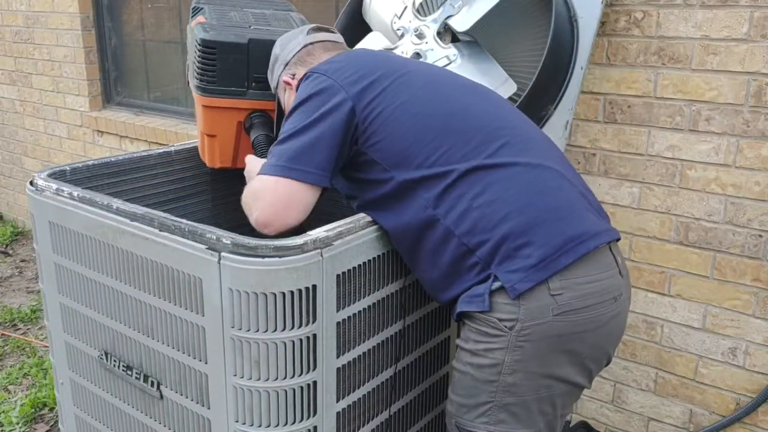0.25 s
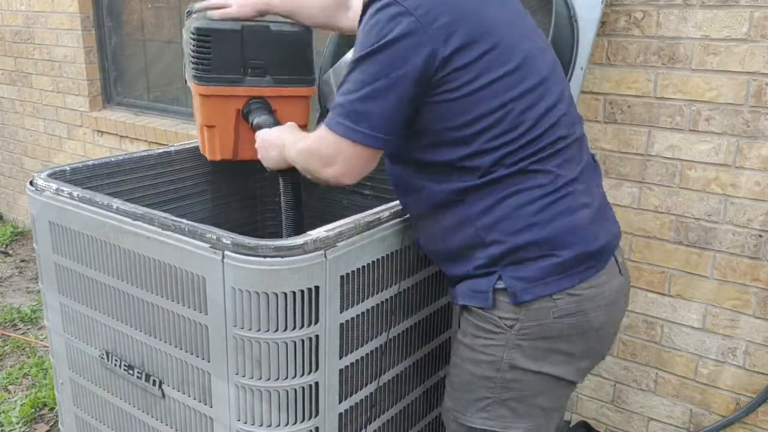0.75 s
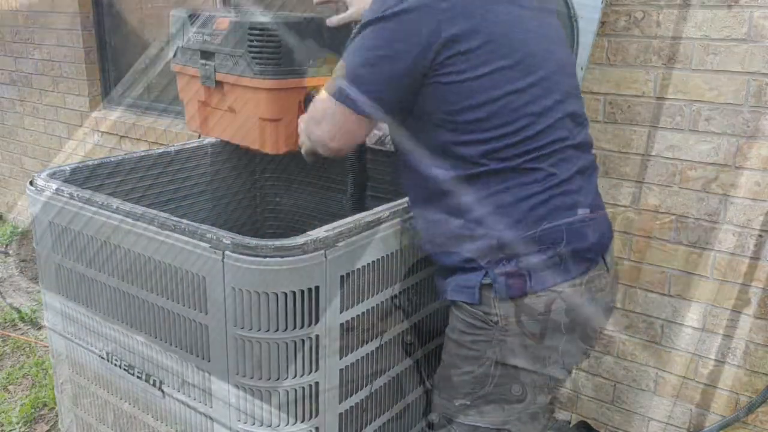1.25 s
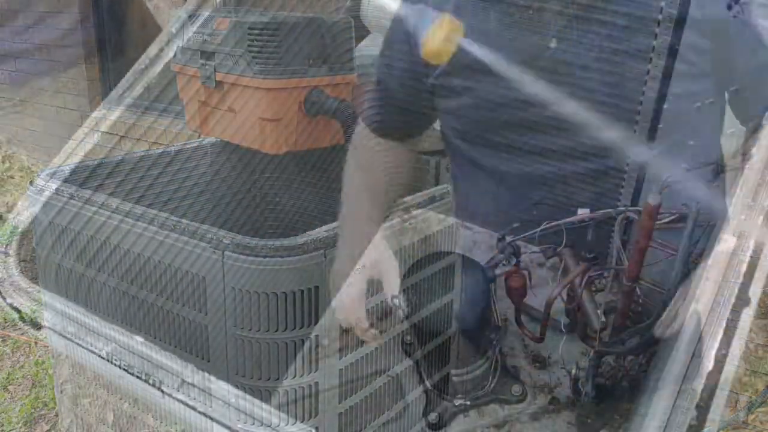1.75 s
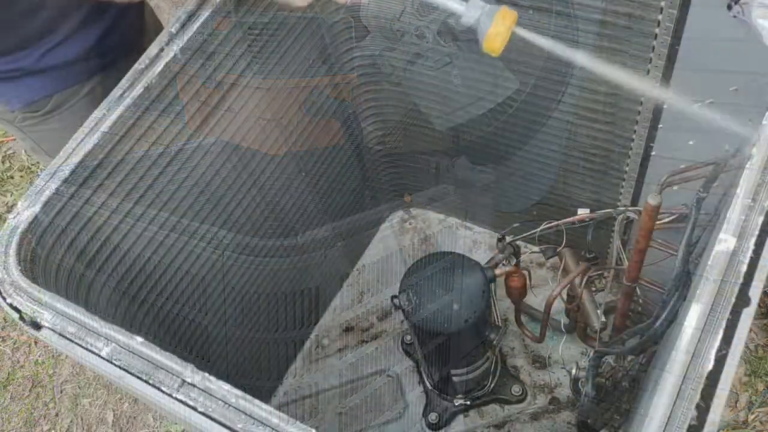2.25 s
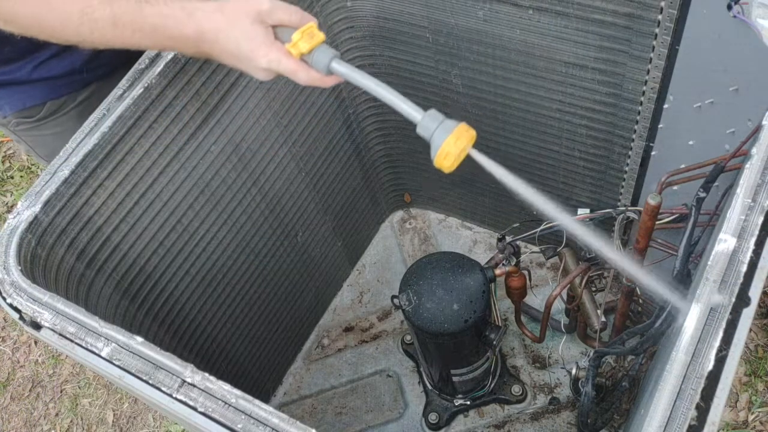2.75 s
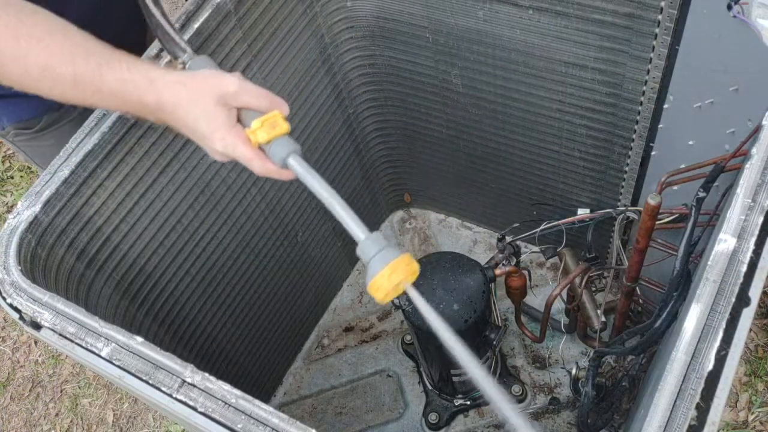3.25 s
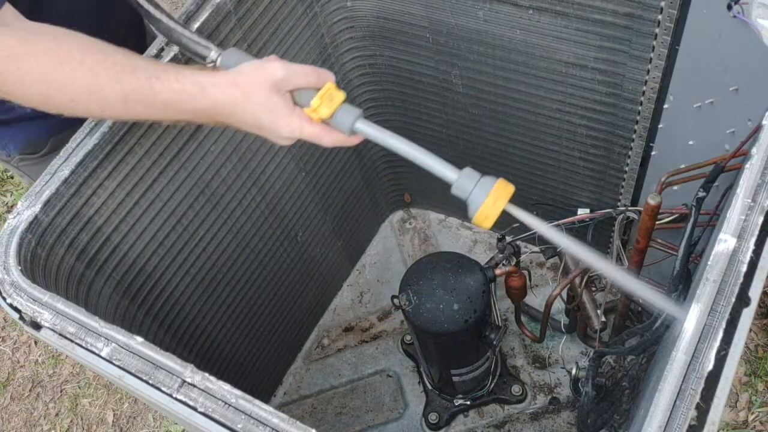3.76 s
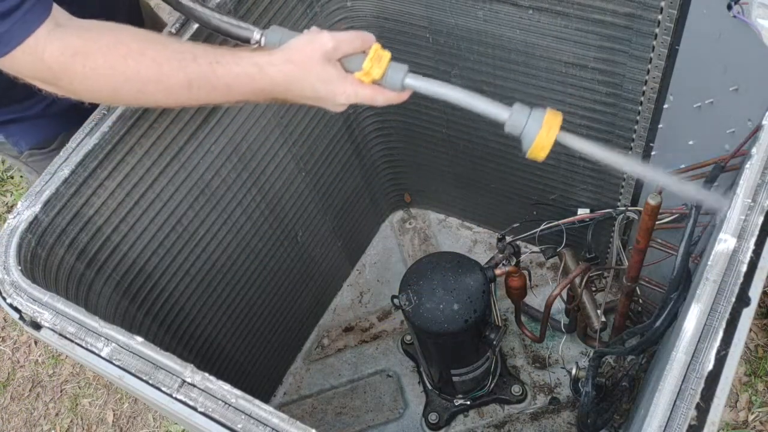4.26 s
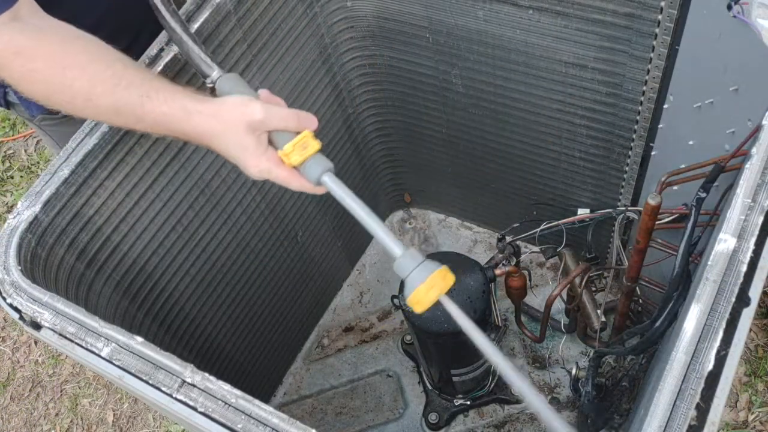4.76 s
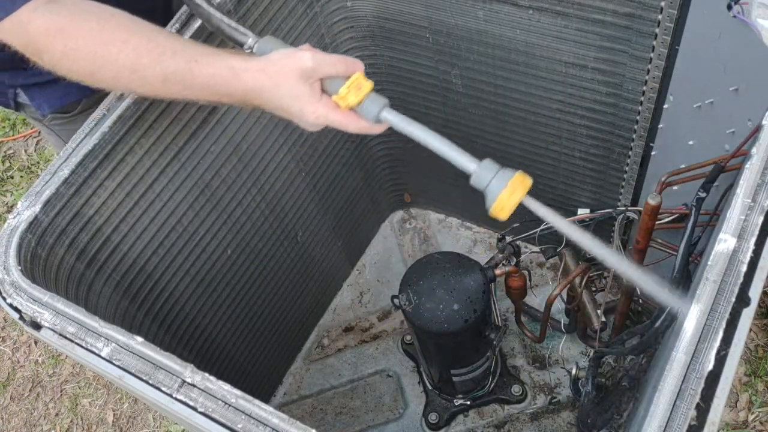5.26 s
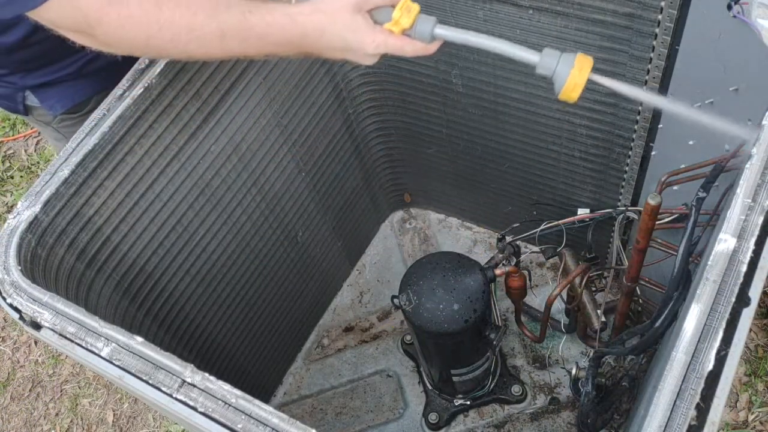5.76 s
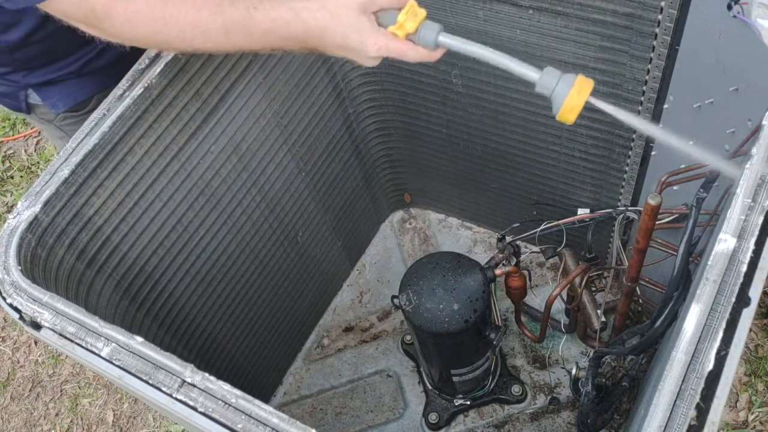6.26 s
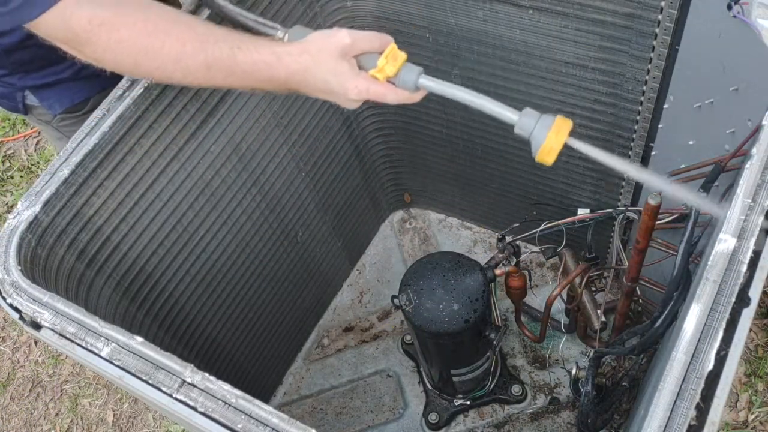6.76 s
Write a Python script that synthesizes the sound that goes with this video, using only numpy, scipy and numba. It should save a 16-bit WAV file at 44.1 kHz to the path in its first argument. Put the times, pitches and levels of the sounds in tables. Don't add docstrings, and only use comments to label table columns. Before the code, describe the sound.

A garden hose jet plays over metal coil fins outdoors, heard close in mono. Silence comes first, then abrupt dense hissing with a ringing edge around the fins. The jet slips off for a moment near one second, returns, swells around two and a half, and settles to a quieter, uneven sweep with late surges. Splashing tubes, short cabinet reflections, faint panel drumming and low yard hum surround it.

```python
import sys
import numpy as np
from scipy import signal
from scipy.fft import rfft, irfft
from scipy.io import wavfile
from scipy.ndimage import uniform_filter1d
from numba import njit

SR = 44100
rng = np.random.default_rng(int(sys.argv[2]) if len(sys.argv) > 2 else 0)


def wrap_up_sound(samples):
    columns = np.atleast_2d(samples).T
    tamed = np.clip(columns, -1, 1)
    steps = np.round(tamed * 32767).astype(np.int16)
    wavfile.write(sys.argv[1], SR, steps)


def rack_gain(trim_db):
    fader = np.asarray(trim_db, float)
    return 10 ** (fader / 20)


N = 308700

# (time [s], jet force [dB], fin ring against force [dB], fin ring pitch [Hz])
JET_AIM = [(0.58, -27, 0, 2170), (0.8, -23.5, -1, 2135), (1.12, -28, -4, 2210), (1.3, -27.5, -5.5, 2050),
           (1.79, -31.5, -4, 2014), (1.97, -28.5, -4.5, 2080), (2.3, -25, -8.5, 1970),
           (2.63, -24, -3, 2036), (2.76, -26.5, -5.5, 2050), (3.1, -31, -3, 1965), (3.5, -33.5, -4.5, 2055),
           (3.9, -29.5, -2.5, 1977), (4.1, -26, -5.5, 1995), (4.55, -31, -3.5, 1910),
           (5.0, -31.5, -5, 2020), (5.15, -33.5, -6.5, 1880), (5.8, -32.5, -5.5, 1994),
           (7.0, -30, -5.5, 1950)]
# (time [s], centre [Hz], sharp core against wide skirt [dB])
HISS_COLOUR = [(0.57, 7830, 24), (1.16, 7920, -4), (1.54, 7600, -4), (2.72, 7850, 12), (3.1, 7520, -4),
               (3.94, 7760, 18), (4.98, 7550, -8), (6.18, 7730, 7), (7.0, 7770, 13)]
# (pitch [Hz], width [Hz], level [dB])
FIN_MODES = [(1879, 26, 5.5), (1950, 33, 0), (2080, 120, -9.5), (2164, 115, 9.5), (2110, 330, -4)]
# (frequency [Hz], level [dB per Hz])
SPLASH_COLOUR = [(1200, -29), (2300, 7), (3200, 5), (4300, 5), (5300, 4.5), (6500, 2.5), (9000, -34)]
# (frequency [Hz], level [dB per Hz])
MIST_COLOUR = [(6500, -14), (9000, -1.5), (10000, 0), (11000, -3), (12500, -10.5), (14000, -13.5),
               (15800, -22)]
# (leaves [s], returns [s], loss [dB])
MISSES = [
    (0.851, 1.031, 23.5),
    (1.163, 1.258, 11.5),
]
# (time [s], half length [s], gain [dB],
# extra mist [dB])
SURGES = [(1.31, 0.016, 2, -3), (1.37, 0.036, -4.5, 6), (1.42, .02, 2.5, -2), (1.55, 0.1, -1.5, 4),
          (1.66, 0.026, -2.5, 2), (2.65, .035, 3.5, 7), (2.79, 0.018, -3, 9), (2.85, 0.017, 1, 9),
          (3.62, 0.11, 4, -3), (3.99, 0.075, 2, -8), (4.27, 0.099, 6, 4), (4.33, 0.1, .5, 4),
          (4.5, .03, 1.5, -1), (5.89, 0.046, 5, -5), (6.09, 0.052, 6.5, -10), (6.3, 0.053, 5.5, -17),
          (6.46, 0.054, 6, -2), (6.56, .03, 1, -3), (6.65, 0.072, 2.5, 2), (6.75, 0.033, -5, 5),
          (6.88, 0.075, 3.5, 2)]
# (time [s], half length [s], extra splash [dB], extra ring [dB], ring shift [Hz])
TUBE_ROWS = [(.68, 0.066, -2, -4.5, -80), (1.07, 0.039, -2, -2.5, -100), (1.14, 0.045, 1, 7, 102),
             (1.35, .05, 4, -5, 30), (1.5, 0.03, 8, 0, 30), (1.67, 0.035, 2.5, -5.5, 40),
             (2.2, 0.098, 0.5, -2.5, -38), (4.98, 0.035, 0, -1.5, 120), (2.47, 0.19, -1.5, 2, 40),
             (2.75, .04, -2, -4, 10), (2.88, 0.085, -2, -7.5, -30), (2.96, .02, 2.5, 5.5, -67),
             (3.19, 0.064, 0.5, -4, -30), (3.57, 0.083, 3, 3.5, 10), (3.72, 0.033, -1.5, -1.5, -40),
             (4.39, 0.062, -3, -10.5, 80), (5.32, 0.11, 4.5, -8, 150), (5.46, .025, 1.5, -9, 30),
             (5.52, .03, -5, 3.5, -30), (5.66, 0.078, 0.5, -6, 60), (5.92, .08, -1, 3, 57),
             (6.1, .05, 0, -0.5, 40), (6.73, 0.085, 4.5, 4.5, -27), (6.85, .03, 2, 3.5, -70)]
# (start [s], end [s], from [Hz], to [Hz], depth [0-1])
HOLLOWS = [
    (.5, 1.6, 3160, 3370, .35),
    (1.6, 2.497, 3264, 4770, 0.5),
    (3.26, 3.55, 3400, 3330, 0.34),
    (3.9, 4.5, 3300, 3360, 0.4),
    (4.802, 5.254, 3170, 2980, 0.47),
    (5.4, 7.195, 2900, 5030, 0.5),
]
# (frequency [Hz], level [dB per Hz])
CABINET_COLOUR = [(250, -12.5), (450, -3.5), (700, -1), (1100, 0.5), (1600, 1), (2400, -2)]
# (pitch [Hz], width [Hz], level [dB])
PANELS = [(254.7, 10, -1), (287, 3.9, 0.5), (316.6, 10.3, 5.5), (435.2, 9.2, 1.5), (603, 14, -9),
          (667, 8, -3)]
# (time [s], half length [s], extra drum [dB], extra boom [dB])
RUNOFF = [(.65, 0.45, 2, 0), (.88, .05, 2.5, 0), (1.2, 0.29, -0.5, 7.5), (1.6, .1, 1, 4.5),
          (1.95, 0.25, 0, 6), (2.5, 0.18, -1, 8), (3.45, 0.063, -1.5, 6), (4.17, 0.037, 0, 6),
          (5.5, 0.27, 0, 6.5), (6.25, 0.22, -1, 5.5)]
# (time [s], pitch [Hz], level [dB])
FAN = [(0.6, 54.6, -69), (1.47, 54, -70), (1.95, 60.2, -64), (2.65, 65.2, -65), (5.5, 62.2, -72.5),
       (7.0, 64.5, -70)]
# (time [s], pitch [Hz], level [dB])
MOWER = [(0.6, 86.9, -55), (1.0, 85.6, -47), (1.456, 86.4, -58), (1.65, 93.3, -50), (2.06, 98.5, -51.5),
         (2.38, 96.0, -63)]
# (time [s], pitch [Hz], level [dB])
PUMP = [(2.4, 99.4, -56), (2.9, 103.1, -66), (3.58, 100.1, -68), (3.7, 102.3, -56), (5.22, 102.2, -63.5),
        (5.64, 102.5, -56), (6.27, 98.9, -53), (7.0, 101.6, -67)]
# (time [s], pitch [Hz], level [dB])
WHINE = [(5.3, 198, -70), (5.7, 195, -61), (6.246, 194, -54.5), (6.62, 193.3, -58), (6.9, 191.3, -64)]
# (time [s], pitch [Hz], level [dB])
MAINS = [(0.6, 119.7, -55.5), (1.7, 122.4, -61.5), (2.35, 119.6, -70), (3.66, 122.5, -74),
         (3.81, 123.5, -55.5), (4.34, 117.8, -62), (5.2, 117.3, -63.5), (6.2, 122.7, -73), (7.0, 120, -56)]
# (pitch [Hz], level [dB])
HUMS = [(88, -72), (146, -77), (220, -76)]
# (time [s], level [dB])
RUMBLE = [(0.6, -53), (2.06, -39), (2.31, -61), (3.3, -55), (5.22, -60), (6.25, -42.5), (6.8, -52.5),
          (7.0, -45)]
# (frequency [Hz], level [dB per Hz])
YARD_COLOUR = [(30, -29), (50, -20), (80, 0), (130, -9), (170, 1), (210, -3), (300, -0.5), (1000, -3),
               (3000, -10.5)]
# (time [s], half length [s], pitch [Hz], width [Hz], level [dB])
PARTS = [(.72, 0.082, 11200, 900, -42), (0.747, 0.031, 3590, 40, -38), (0.79, .025, 2760, 150, -41),
         (0.894, 0.064, 2170, 42, -46), (1.696, 0.054, 3450, 440, -41), (1.693, .04, 4250, 300, -41),
         (2.62, 0.22, 4400, 900, -36), (2.796, .06, 12400, 900, -48), (2.92, .12, 9600, 1500, -41),
         (3.59, 0.1, 4000, 996, -36), (3.60, 0.076, 2450, 600, -35.5), (4.068, 0.098, 4360, 300, -46),
         (4.127, 0.096, 10700, 540, -41), (4.265, 0.11, 9100, 740.7, -31.5),
         (4.344, 0.093, 5660, 900, -35.5), (4.95, 0.11, 6300, 756, -37), (5.119, 0.11, 2490, 60, -52),
         (5.391, 0.048, 1210, 700, -38), (6.90, .05, 10500, 600, -36.5)]

ON_S, FADE_S = 0.560, 0.02
HISS_WIDTH_HZ, SKIRT_WIDTH_HZ = 1400, 2730
RING_WIDTH_HZ, REACH_HZ = 240, 110
FORCE_DB = -29.5
SPLASH_DB, MIST_DB, DRUM_DB, BOOM_DB, YARD_DB = -5.5, -14.5, -41, -12.5, -53.5
SPLASH_LAG, MIST_LAG, RING_LAG, DRUM_FOLLOW = 0.36, 0.65, 0.7, 0.12
DRUM_MISS, SPLASH_MISS, MIST_MISS = 0.65, 0.14, 0.36
LEAVE_S, RETURN_S, RING_LEAVE_S, DRUM_LEAVE_S = 0.03, 0.021, 0.04, 0.05
DRAIN_S, RING_ON_S = 0.048, 0.019
TRAIL = 1.11
BOX_T60_S, BOX_DB = 0.06, -15
SWEEP_TURNS = 0.892
TOP_HZ = 15740


def unit(x):
    return x / np.sqrt(np.mean(x ** 2))


def curves(table):
    s, *columns = np.transpose(table)
    t = np.arange(N) / SR
    return [np.interp(t, s, c) for c in columns]


def swells(table):
    rows = np.array(table)
    u = (np.arange(N) / SR - rows[:, :1]) / rows[:, 1:2]
    bells = np.exp(-np.where(u > 0, u / TRAIL, u * TRAIL) ** 2)
    return rows[:, 2:].T @ bells


def missed(leave_s, late_s=0.0):
    t = np.arange(N) / SR
    loss_db = np.zeros(N)
    for leaves, returns, db in MISSES:
        gone = 1 + np.tanh((t - leaves - late_s) / leave_s)
        not_back = 1 - np.tanh((t - returns) / RETURN_S)
        loss_db += db / 4 * gone * not_back
    return loss_db


@njit
def svf(x, hz, width):
    y, band, low = np.empty(len(x)), 0., 0.
    for i in range(len(x)):
        g, k = np.tan(np.pi * hz[i] / SR), width / hz[i]
        v = (band + g * (x[i] - low)) / (1 + g * (g + k))
        band, low, y[i] = 2 * v - band, low + 2 * g * v, k * v
    return y


def ring(x, hz, width_hz):
    return unit(svf(x, hz + np.zeros(N), float(width_hz)))


def colour(x, points):
    hz, db = np.transpose(points)
    f = np.log(np.fft.rfftfreq(8192, 1 / SR) + 1)
    outside = np.maximum(np.log(hz[0]) - f, 0) + np.maximum(f - np.log(hz[-1]), 0)
    shape_db = np.maximum(np.interp(f, np.log(hz), db) - 40 * outside, -90)
    cepstrum = irfft(np.log(rack_gain(shape_db)))
    cepstrum[1:4096] *= 2
    cepstrum[4097:] = 0
    response = irfft(np.exp(rfft(cepstrum)))
    return unit(signal.fftconvolve(x, response)[:N])


def walk(rate):
    k = max(int(SR / rate), 1)
    held = np.repeat(rng.standard_normal(N // 8)[:N // k + 1], k)
    return unit(uniform_filter1d(uniform_filter1d(held, k), k)[:N])


def drops(per_s, spread_db, blur_db, flutter_db):
    chance = rng.random((N, 2)).T
    size = rack_gain(np.minimum(spread_db * rng.exponential(size=N), 19))
    hits = (chance[0] < per_s / SR) * np.sign(chance[1] - 0.5) * size
    blur = rack_gain(blur_db) * rng.standard_normal(N)
    flutter = rack_gain(flutter_db * (walk(25) + walk(180)))
    return (unit(hits) + blur) * flutter


def hollow(spray):
    t = np.arange(N) / SR
    for start, end, from_hz, to_hz, depth in HOLLOWS:
        u = np.clip((t - start) / (end - start), 0, 1)
        amount = depth * np.sqrt(np.abs(np.sin(np.pi * u)))
        spray = spray - amount * svf(spray, from_hz + (to_hz - from_hz) * u, 1500.0)
    return spray


def fin_hiss(fine):
    centre_hz, core_db = curves(HISS_COLOUR)
    skirt = ring(ring(fine, centre_hz, SKIRT_WIDTH_HZ), centre_hz, 1.16 * SKIRT_WIDTH_HZ)
    core = ring(ring(fine, centre_hz, HISS_WIDTH_HZ), centre_hz, 2.2 * HISS_WIDTH_HZ)
    return (skirt + rack_gain(core_db - 4) * core) / (1 + rack_gain(core_db - 2.5))


def fin_ring(coarse, ring_hz):
    modes = np.zeros(N)
    for hz, width, db in FIN_MODES:
        nearness = np.exp(-((ring_hz - hz) / REACH_HZ) ** 2)
        modes += rack_gain(db) * nearness * ring(coarse, hz, width)
    gap = ring(ring(coarse, ring_hz, RING_WIDTH_HZ), ring_hz, 1.6 * RING_WIDTH_HZ)
    return unit(gap + rack_gain(-5.0) * modes)


def jet():
    force_db, ring_db, ring_hz = curves(JET_AIM)
    surge_db, haze_db = swells(SURGES)
    row_splash_db, row_ring_db, shift_hz = swells(TUBE_ROWS)
    miss_db = missed(LEAVE_S)
    over_db = force_db + surge_db - FORCE_DB
    hiss_db = force_db + surge_db - miss_db + 0.33 * walk(18)

    ring_db = ring_db - RING_LAG * surge_db + row_ring_db + 0.58 * walk(14) - 0.38
    ring_db += miss_db - 2.14 * missed(RING_LEAVE_S, RING_ON_S)
    ring_hz = ring_hz + shift_hz + 15 * walk(20)
    splash_db = SPLASH_DB - SPLASH_LAG * over_db + row_splash_db + SPLASH_MISS * miss_db + walk(10)
    mist_db = MIST_DB - MIST_LAG * over_db + haze_db + MIST_MISS * miss_db + 0.5 * walk(10)

    fine = drops(9000, spread_db=2.5, blur_db=4.5, flutter_db=0.71)
    coarse = drops(4000, spread_db=3.0, blur_db=2.5, flutter_db=0.93)
    haze = drops(13000, spread_db=-7.0, blur_db=7.0, flutter_db=0.3)
    splash = colour(coarse + 1.14 * fine, SPLASH_COLOUR)
    mist = colour(haze + 0.19 * fine, MIST_COLOUR)
    spray = hollow(fin_hiss(fine) + rack_gain(splash_db) * splash + rack_gain(mist_db) * mist)
    return rack_gain(hiss_db) * (spray + rack_gain(ring_db) * fin_ring(coarse, ring_hz))


def cabinet():
    pour_db, pan_db = swells(RUNOFF)
    force_db = curves(JET_AIM)[0]
    level_db = DRUM_DB + pour_db + DRUM_FOLLOW * (force_db - FORCE_DB) + 0.88 * walk(14)
    level_db -= DRUM_MISS * missed(DRUM_LEAVE_S, DRAIN_S)
    boom_db = BOOM_DB + pan_db + 0.17 * missed(DRUM_LEAVE_S) + 0.3 * walk(12)
    heavy = drops(1500, spread_db=2.0, blur_db=6, flutter_db=0.82)
    boom = unit(sum(rack_gain(db) * ring(ring(heavy, hz, width), hz, 3 * width) for hz, width, db in PANELS))
    return rack_gain(level_db) * (rack_gain(2.08) * colour(heavy, CABINET_COLOUR) + rack_gain(boom_db) * boom)


def tone(hz, db, wobble_db):
    level = np.sqrt(2) * rack_gain(db + wobble_db * (walk(5) + 0.91 * walk(13)))
    turns = np.cumsum(hz + np.zeros(N)) / SR + rng.random()
    return level * np.sin(2 * np.pi * turns)


def traffic():
    t = np.arange(N) / SR
    takeover = np.clip((t - MOWER[-1][0]) / 0.5 + 1, 0.15, 1)
    low = ring(ring(rng.standard_normal(N), 104.0, 22), 96, 27)
    return rack_gain(curves(RUMBLE)[0] - 5.0) * takeover * low


def yard():
    t = np.arange(N) / SR
    fan_and_mains = tone(*curves(FAN), wobble_db=-0.5) + tone(*curves(MAINS), wobble_db=1.1)
    hums = sum(tone(hz, db, wobble_db=2.2) for hz, db in HUMS)
    mower = tone(*curves(MOWER), wobble_db=1.5) * np.clip((MOWER[-1][0] - t) / 0.3, 0, 1)
    pump = tone(*curves(PUMP), wobble_db=1.5) * np.clip((t - PUMP[0][0]) / 0.2, 0, 1)
    nearest_end = np.minimum(t - WHINE[0][0], WHINE[-1][0] - t)
    whine = tone(*curves(WHINE), wobble_db=1.5) * np.clip(nearest_end / 0.065, 0, 1)
    air = rack_gain(YARD_DB) * colour(rng.standard_normal(N), YARD_COLOUR)
    return fan_and_mains + hums + mower + pump + whine + traffic() + air


def parts():
    t = np.arange(N) / SR
    spray = drops(4000, spread_db=2.5, blur_db=-12, flutter_db=2.4)
    out = np.zeros(N)
    for s, half, hz, width, db in PARTS:
        swell = np.exp(-((t - s) / half) ** 2)
        out += rack_gain(db) * swell * ring(ring(spray, hz, width), hz, 3 * width)
    return out


def box(x):
    t = np.arange(int(0.2 * SR)) / SR
    echoes = rng.standard_normal((2, len(t))) * rack_gain(-60 * t / BOX_T60_S) * (t > 0.002)
    place = 2 * np.pi * SWEEP_TURNS * np.arange(N) / SR + 0.51 * walk(2.914)
    wet = np.zeros(N)
    for weight, echo in zip((np.cos(place), np.sin(place)), echoes):
        wet += signal.fftconvolve(x * weight, echo / np.sqrt(np.sum(echo ** 2)))[:N]
    return (x + rack_gain(BOX_DB) * wet) / np.sqrt(1 + rack_gain(2 * BOX_DB))


def scene():
    water = box(jet() + cabinet() + parts())
    return np.tile(water + yard(), (2, 1))


def top_cut(x):
    return signal.sosfilt(signal.butter(12, 15810, fs=SR, output="sos"), x)


def record(dry):
    fade = np.clip((np.arange(N) / SR - ON_S) / FADE_S, 0, 1)
    low_pass = signal.ellip(10, 0.3, 60, TOP_HZ, fs=SR, output="sos")
    dull = signal.sosfilt(low_pass, dry)
    return top_cut(dull * np.sin(np.pi / 2 * fade) ** 2)


dry = scene()
out = record(dry)
wrap_up_sound(out)
```